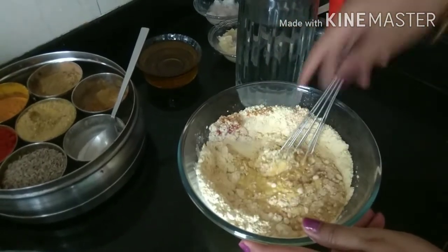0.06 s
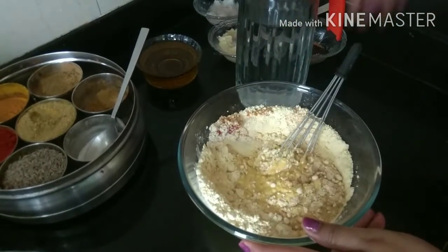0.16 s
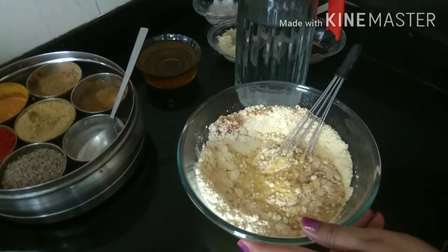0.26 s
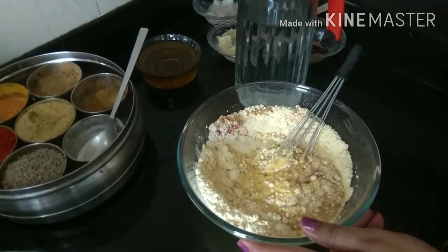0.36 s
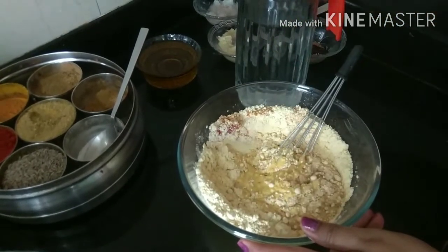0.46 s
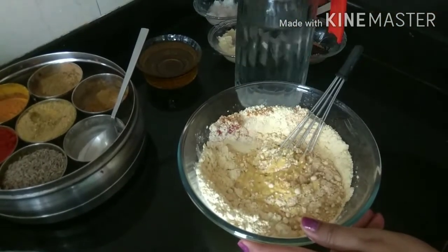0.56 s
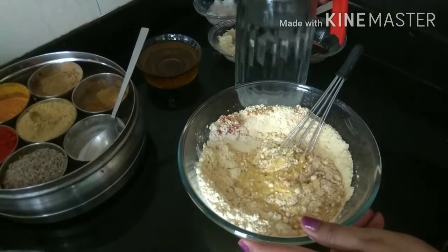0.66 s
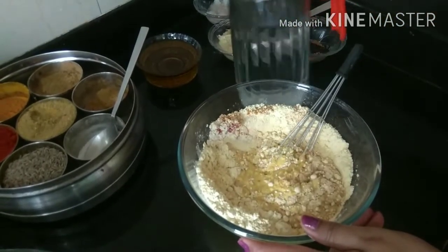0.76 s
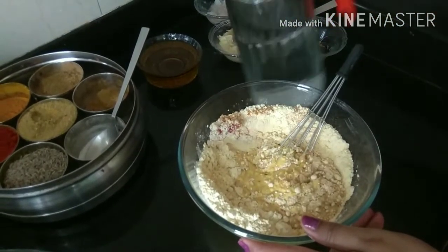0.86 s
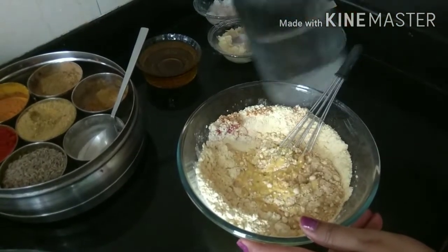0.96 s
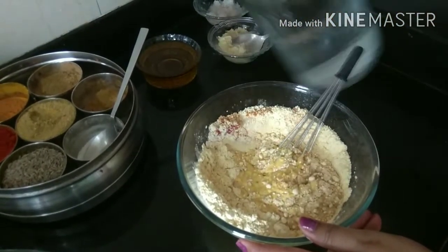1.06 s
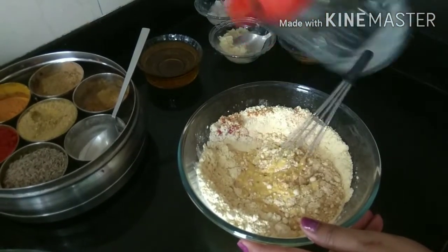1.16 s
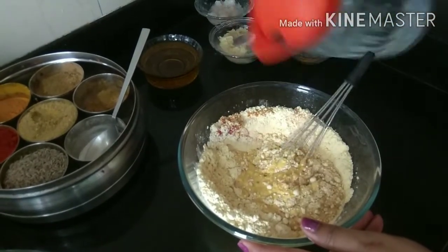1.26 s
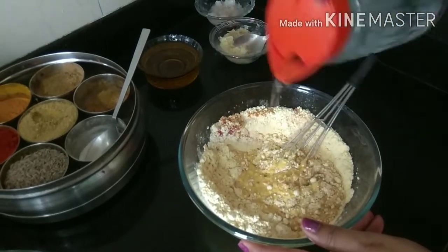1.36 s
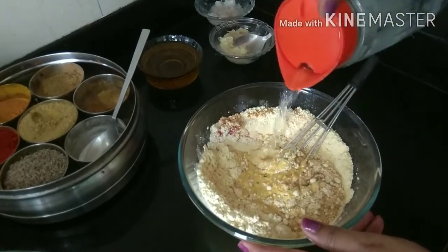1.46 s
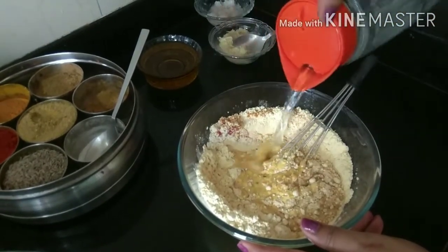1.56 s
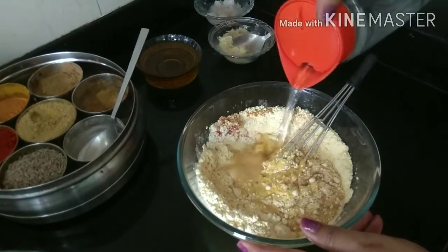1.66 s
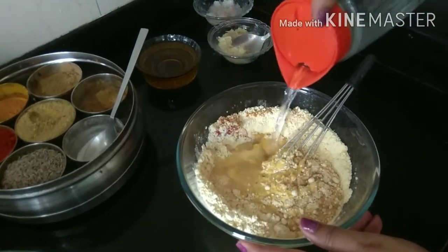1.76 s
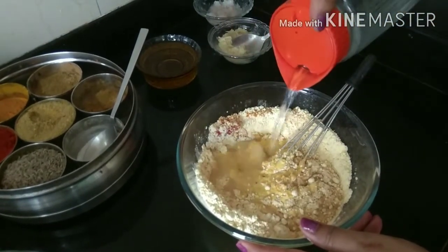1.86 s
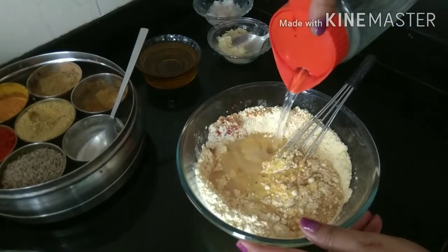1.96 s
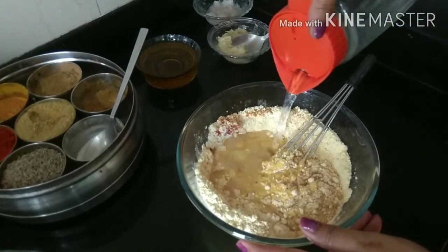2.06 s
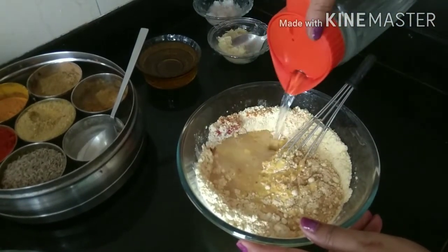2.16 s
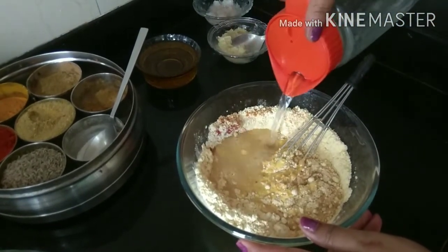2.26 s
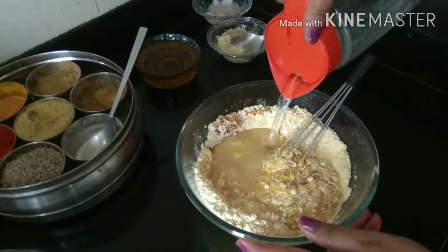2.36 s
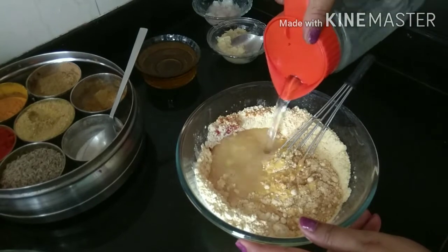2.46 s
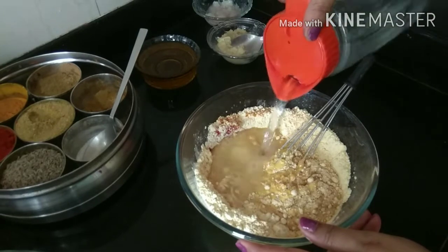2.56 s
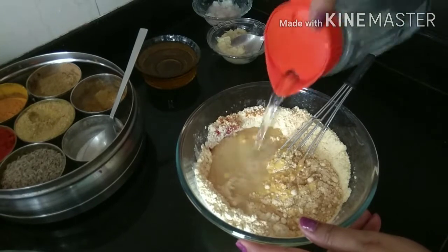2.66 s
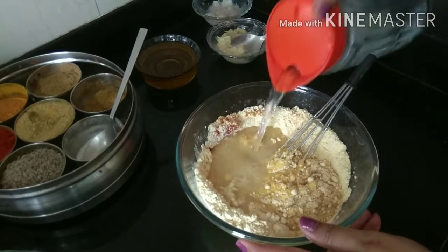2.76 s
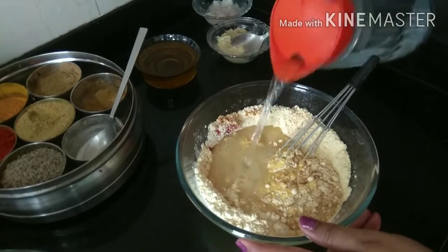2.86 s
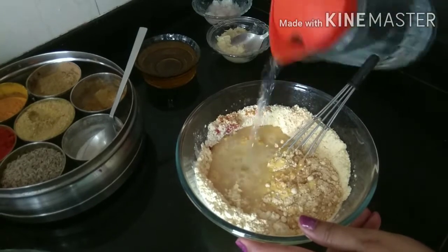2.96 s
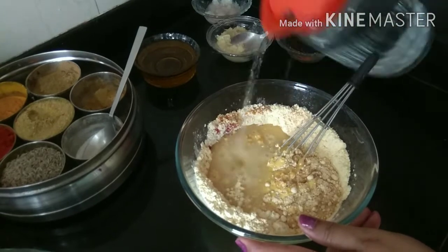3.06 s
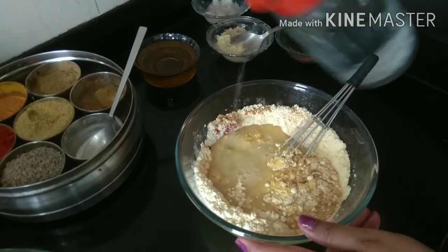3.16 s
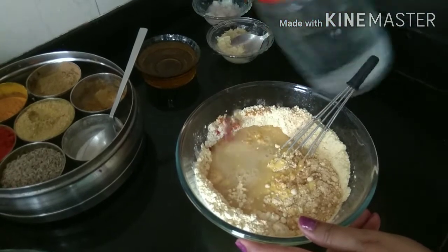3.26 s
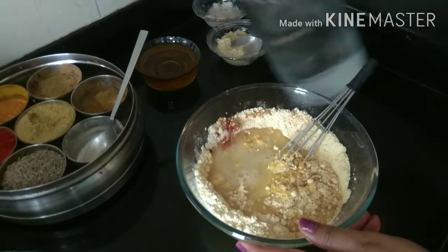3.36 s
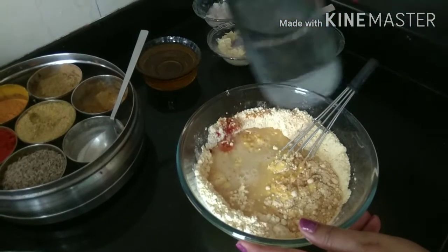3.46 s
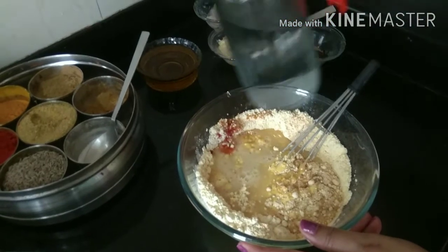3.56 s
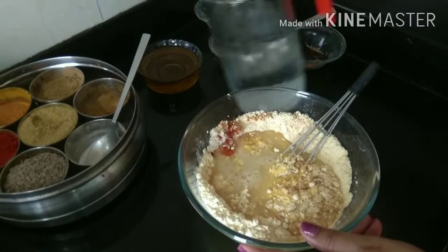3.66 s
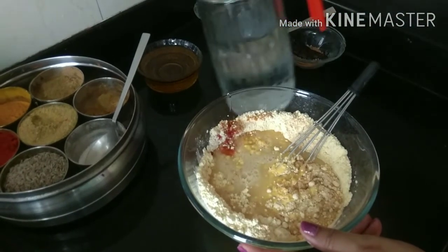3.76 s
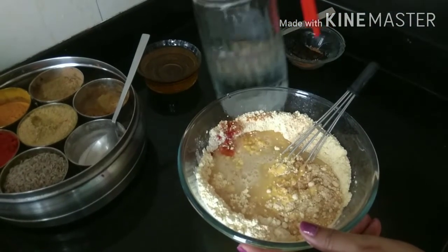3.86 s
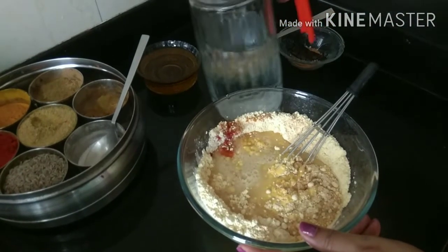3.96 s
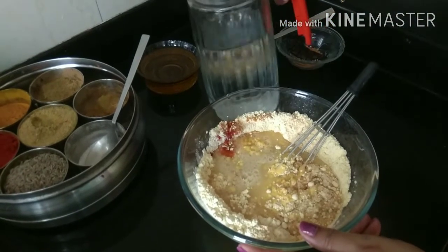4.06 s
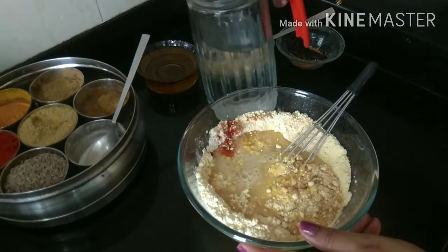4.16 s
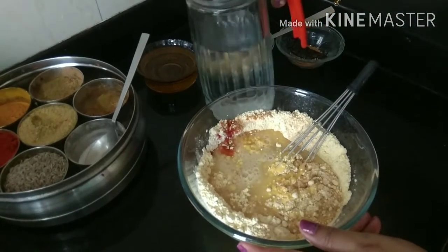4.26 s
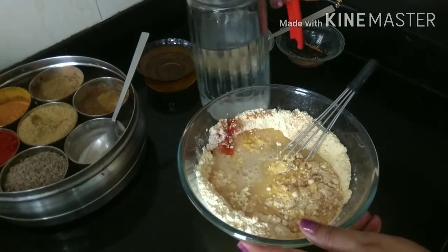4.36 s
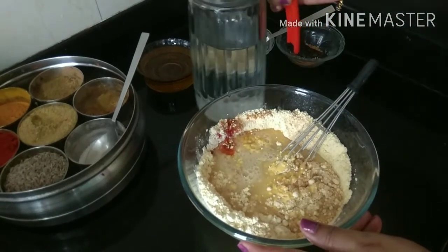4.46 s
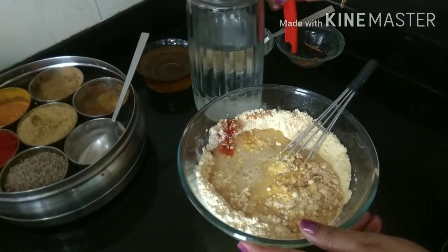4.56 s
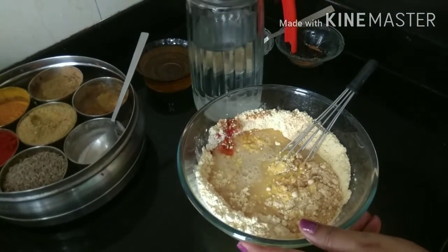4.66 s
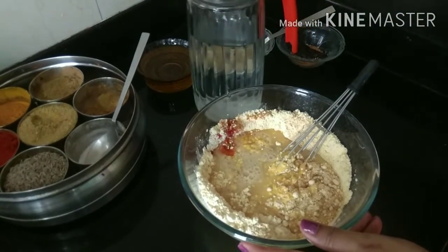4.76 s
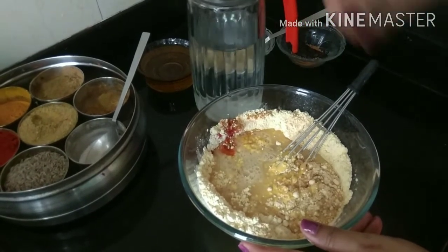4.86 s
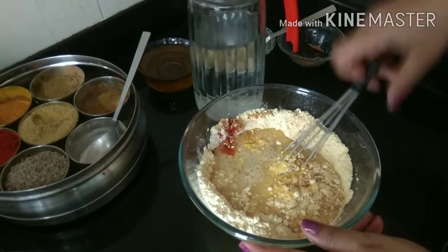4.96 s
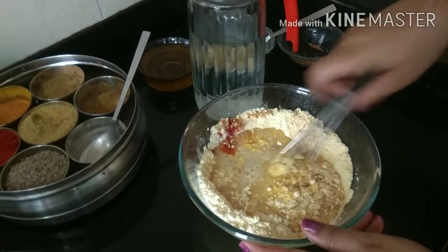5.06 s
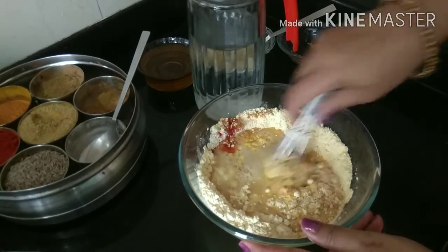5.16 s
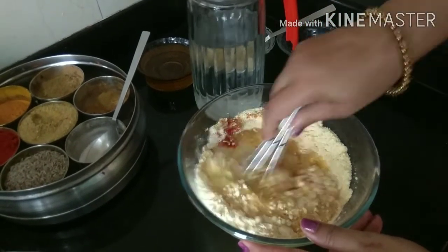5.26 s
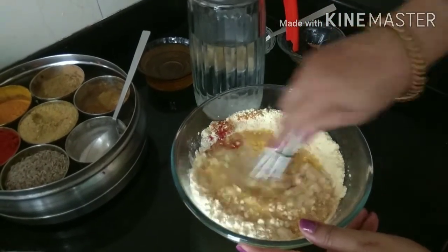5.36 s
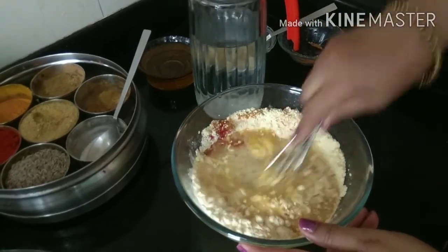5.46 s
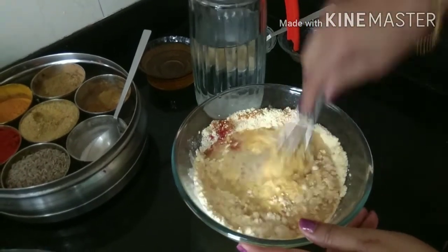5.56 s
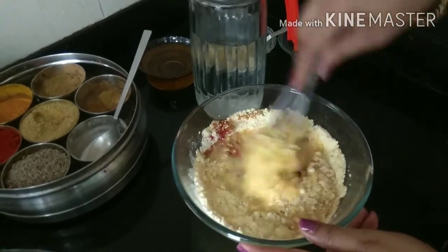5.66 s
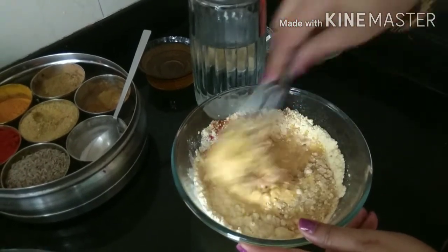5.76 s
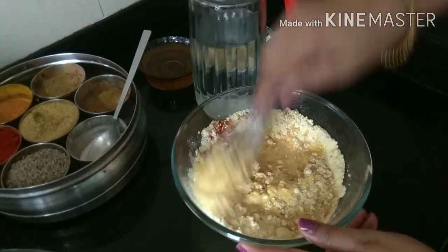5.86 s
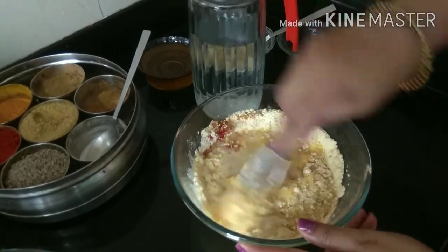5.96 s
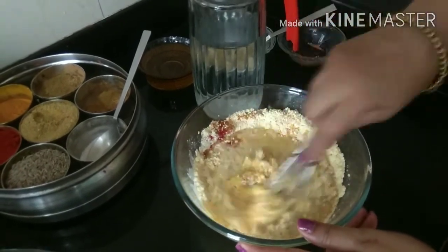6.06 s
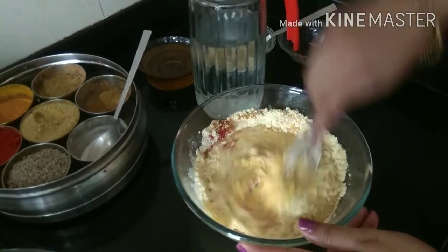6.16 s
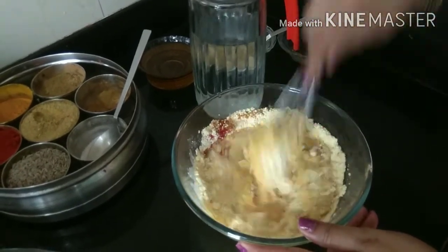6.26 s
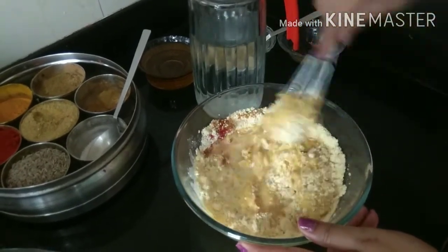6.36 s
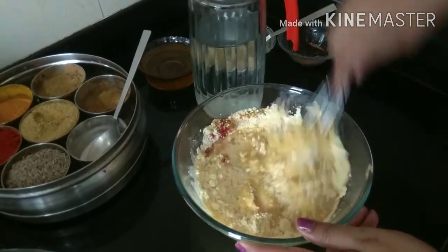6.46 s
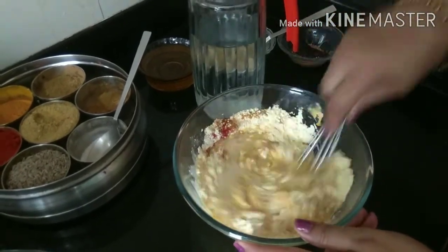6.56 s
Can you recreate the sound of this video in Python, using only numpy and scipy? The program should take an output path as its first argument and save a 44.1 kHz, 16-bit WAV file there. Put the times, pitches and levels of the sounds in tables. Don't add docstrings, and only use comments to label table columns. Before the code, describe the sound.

A glass jug knocks and rings, water pours with bright fizz and gurgle, the jug thuds down on stone, then a whisk strokes wet batter.

```python
import sys
import numpy as np
from scipy import signal
from scipy.fft import rfft, irfft
from scipy.io import wavfile
from scipy.ndimage import uniform_filter1d

SR = 44100
rng = np.random.default_rng(int(sys.argv[2]) if len(sys.argv) > 2 else 0)


def boost(x):
    u = np.asarray(x, float) / 20
    return 10 ** u


def log_audio(samples):
    frames = np.atleast_2d(samples).T
    limited = np.clip(frames, -1, 1)
    pcm = np.round(limited * 32767).astype(np.int16)
    wavfile.write(sys.argv[1], SR, pcm)


N = 291501
TIME = np.arange(N) / SR

# (f/Hz, density/dB per Hz)
FIZZ_COLOUR = [(2350, -26.5), (4000, -3), (6660, -7), (8700, -4.5), (9550, -2.5), (11300, -3),
               (14900, -16.5), (15500, -12.5), (16000, -48)]


def rms_one(x):
    return x / np.sqrt(np.mean(x ** 2) + 1e-20)


def at_hz(points, hz):
    p = np.array(points)
    return np.interp(np.log(np.maximum(hz, 1)), np.log(p[:, 0]), p[:, 1])


def pan(pan_db):
    return boost(np.array([[pan_db], [-pan_db]]) / 2)


def gain_curve(rows, db_at=0, follows=1):
    s, db = np.transpose(rows)
    fade = np.clip(np.minimum(TIME - s[0], s[-1] - TIME) / .04 + 1, 0, 1)
    return fade * boost(db_at + follows * np.interp(TIME, s, db))


def bursts(table, rise_s):
    gain = 0
    for s, db, length in table:
        decay = np.exp(-np.maximum(TIME - s, 0) / length)
        gain = gain + boost(db) * decay * np.clip((TIME - s) / rise_s, 0, 1)
    return gain


def swell(s, db, length, edge=0.17):
    inside = np.minimum(TIME - s, s + length - TIME)
    return boost(db) * np.sin(np.pi / 2 * np.clip(inside / (edge * length), 0, 1)) ** 2


def swells(table):
    return sum(swell(*row) for row in table)


def drift(rate):
    knots = rng.standard_normal(int(N / SR * 60) + 2)
    r = np.exp(-2 * np.pi * min(rate, 25) / 60)
    slow = signal.lfilter([1], [1, -r], knots)
    return np.interp(TIME * 60, np.arange(len(slow)), rms_one(slow))


def stereo_noise(alike):
    mid, side = rng.standard_normal((2, N))
    alike = np.clip(alike, 0, 1)
    return np.sqrt((1 + alike) / 2) * mid + np.sqrt((1 - alike) / 2) * side * [[1], [-1]]


def grains(per_s, spread_db):
    size = boost(spread_db * np.minimum(rng.exponential(1, N), 5)) * rng.choice([-1, 1], N)
    side = boost(rng.normal(0, 2.5, N))
    return (rng.random(N) < per_s / SR) * size * np.array([side, 1 / side]) + 1e-18


def colour(x, spectrum):
    size = 4096
    cepstrum = irfft(np.log(boost(at_hz(spectrum, np.arange(size // 2 + 1) * SR / size))))
    cepstrum[1:size // 2] *= 2
    cepstrum[size // 2 + 1:] = 0
    kernel = irfft(np.exp(rfft(cepstrum)))
    kernel = kernel.reshape((1,) * (x.ndim - 1) + (-1,))
    return signal.oaconvolve(x, kernel, axes=-1)[..., :x.shape[-1]]


def resonate(x, hz, width_hz):
    r = np.exp(-np.pi * width_hz / SR)
    poles = [1, -2 * r * np.cos(2 * np.pi * hz / SR), r * r]
    return signal.lfilter(np.array([1, 0, -1]) * (1 - r * r) / 2, poles, x)


def band_pass(x, order, low_hz, high_hz):
    return signal.sosfilt(signal.butter(order, [low_hz, high_hz], "band", fs=SR, output="sos"), x)


def patchy(x, depth_db, rate):
    edges = 25 * 2 ** np.arange(0, 9.5, 1 / 3)
    out = 0
    for low, high in zip(edges, edges[1:]):
        out = out + band_pass(x, 1, low, high) * boost(depth_db * drift(rate))
    return rms_one(out)


def pops(events, cycles, rise, spray_db, trim_db):
    out, t = np.zeros((2, N + SR)), np.arange(int(.04 * SR)) / SR
    tear_s = .002
    for s, peak_db, hz, pan_db in events:
        turn = np.maximum(t - tear_s, 0) * hz
        wave = np.sin(2 * np.pi * (turn + rise * turn ** 2))
        wave = wave * np.exp(-turn / cycles * 0.99) * np.minimum(turn / 1.1, 1)
        spray = rms_one(resonate(rng.standard_normal((2, len(t))), hz, 0.5 * hz))
        spray = spray * np.exp(-t / 0.0067) * np.minimum(t / 0.0026, 1)
        at = round((s - tear_s) * SR)
        burst = wave / np.max(wave) + boost(spray_db) * spray
        out[:, at:at + len(t)] += boost(peak_db + trim_db) * pan(pan_db) * burst
    return out[:, :N]


def background():
    # (f/Hz, density/dB per Hz)
    air_colour = [(70, -26), (108, -5), (478, -7.5), (706, -13.5), (1190, -6.5), (1440, -34), (1830, -20.5),
                  (2500, -42), (4170, -30.5), (5070, -47), (9930, -40.5), (11100, -28.5), (16000, -36.5)]
    # (f/Hz, width/Hz, level/dB)
    air_peaks = [(480, 1.4, -10.5), (1136, 92, -8.5), (1886, 76, -6), (2270, 160, -12), (10800, 630, -11.5)]
    # (t/s, level/dB, length/s)
    tremors = [(.27, -62, 0.1), (.62, -60, 0.064), (.95, -45.5, 0.19), (2.08, -61.5, 0.42), (2.72, -67, 0.12),
               (3.25, -57, 0.18), (3.52, -51.5, 0.39), (4.1, -49.5, 0.3), (4.46, -63.5, 0.22),
               (4.81, -57, 0.085), (5.2, -60.5, 0.276), (5.37, -57.5, 0.55), (6.09, -52, 0.082),
               (6.21, -54, 0.12), (6.48, -53, 0.28)]
    white = stereo_noise(0.017)
    air = patchy(colour(white, air_colour), 6.0, 3.0)
    for hz, width, db in air_peaks:
        air = air + boost(db + 4.0 * drift(4.0)) * rms_one(resonate(white, hz, width))
    shake = stereo_noise(.97)
    drone_hz, width_hz = 115.7, 23
    drone = rms_one(resonate(resonate(shake, drone_hz, width_hz), drone_hz, 2 * width_hz))
    drone = rms_one(resonate(drone, drone_hz, 3 * width_hz))
    rumble = boost(-12.0) * rms_one(resonate(resonate(shake, 29, 40), 29, 40))
    tremor_gain = boost(2 * drift(21)) * (boost(-71) + swells(tremors))
    return boost(-64) * air + (drone + rumble) * tremor_gain


def birds():
    # (t/s, level/dB, length/s, start f/Hz, end f/Hz)
    whistles = [
        (0.851, -63, 0.15, 3730, 4070),
        (0.861, -59, 0.15, 6520, 6460),
        (5.433, -75, 0.13, 3490, 4100),
        (5.629, -68.5, 0.19, 4270, 4260),
        (5.909, -59, 0.0305, 4030, 3850),
        (5.922, -76, 0.093, 4440, 4190),
        (6.314, -72.5, 0.2, 3420, 4150),
    ]
    # (t/s, level/dB, length/s)
    flock = [
        (-.1, -75.5, 2.3),
        (2.6, -77.5, 1.15),
        (3.7, -92, 0.78),
        (5.3, -84.5, 0.82),
        (6.1, -80.5, 0.37),
        (6.45, -73, 0.79),
    ]
    voices = [(3020, 490, -12.0), (3630, 1300, -5.0), (3950, 300, -11.5), (4240, 49, -8.5)]   # (f/Hz, width/Hz, level/dB)
    out, waver = np.zeros(N), 1 + 0.004 * drift(60)
    for s, db, length, start_hz, end_hz in whistles:
        along = np.clip((TIME - s) / length, 0, 1)
        arch = 1 + .035 * np.sin(np.pi * along) * length / .2
        pitch = (start_hz + (end_hz - start_hz) * along) * arch * waver
        out += np.sqrt(2) * np.sin(2 * np.pi * np.cumsum(pitch) / SR) * swell(s, db, length, edge=0.13)
    white, chatter = stereo_noise(0.27), 0
    for hz, width, db in voices:
        voice = rms_one(resonate(resonate(white, hz, width), hz, width))
        chatter = chatter + boost(db + 5 * drift(7)) * voice
    return out + boost(9.5) * rms_one(chatter) * swells(flock)


def stirring():
    # (f/Hz, density/dB per Hz)
    swish_colour = [(2650, -53), (4500, -8.5), (4650, -13.5), (6320, -9), (8740, 0), (9870, -3.5),
                    (11200, 2.5), (14800, -11), (16000, -30)]
    # (f/Hz, width/Hz, level/dB)
    bowl = [(436.2, 33, 7), (631, 12, 2), (1010, 79, 4.5), (820, 25, -1), (1171, 54, 9.5), (503, 10, 9),
            (1570, 90, 2.5), (1713, 150, 6), (1950, 33, -6), (2060, 17, -12)]
    # (t/s, level/dB)
    effort = [
        (4.85, -108),
        (5.07, -56),
        (5.27, -51),
        (5.44, -55.5),
        (5.87, -65),
        (6.17, -53.5),
        (6.43, -52),
        (6.61, -31.5),
    ]
    # (t/s, rms level/dB, length/s)
    strokes = [(.43, -46, 0.088), (.6, -47.5, 0.035), (3.36, -39, 0.038), (3.4, -42.5, 0.061),
               (3.75, -62.5, 0.19), (5.19, -52.5, 0.078), (5.44, -58, 0.049), (5.585, -51, 0.046),
               (5.645, -38, 0.047), (5.93, -48, 0.064), (6.02, -65, 0.015), (6.16, -64.5, 0.019),
               (6.205, -32.5, 0.024), (6.26, -51, 0.027), (6.305, -54, 0.073), (6.385, -58, 0.025),
               (6.5, -57, 0.032), (6.56, -71, 0.065)]
    # (t/s, level/dB, length/s)
    rubs = [(0, -64.5, 0.22), (.33, -60, 0.091), (.4, -53.5, 0.15), (.62, -59, 0.15), (.85, -63, 0.22),
            (3.4, -66.5, 0.034), (5.63, -61.5, 0.21), (5.9, -51.5, 0.11), (6.1, -64, 0.19),
            (6.33, -55.5, 0.194), (6.52, -61, .15)]
    # (t/s, level/dB, length/s)
    pushes = [
        (1.15, -92.5, 0.47),
        (3.6, -83, 0.19),
        (4.08, -64.5, 0.12),
        (5.21, -60, 0.15),
        (5.45, -63.5, 0.168),
        (6.35, -62, 0.071),
        (6.5, -56.5, 0.063),
    ]
    swish = rms_one(grains(2500, 3.5)) + 1.5 * stereo_noise(0.17)
    swish = patchy(colour(swish, swish_colour), 4.0, 6.4) * pan(5)
    rub, body = stereo_noise(0.2), 0
    for hz, width, db in bowl:
        body = body + boost(db + 3.5 * drift(4)) * resonate(resonate(rub, hz, width), hz, 2 * width)
    push = rms_one(resonate(rub, 185, 12) + 0.26 * resonate(rub, 330, 26))
    tearing = gain_curve(effort, -9.5) + bursts(strokes, 0.046)
    rubbing = boost(-68) + swells(rubs) + gain_curve(effort, -14.5)
    pushing = boost(-72.5) + swells(pushes)
    return swish * tearing + boost(-1.5) * rms_one(body) * rubbing + boost(3.5) * push * pushing


def ticks_and_smacks():
    # (t/s, peak level/dB, f/Hz, left-right/dB)
    ticks = [(4.9904, -57.5, 11000, 4), (5.0592, -53, 10970, 11), (5.193, -47, 10500, 5),
             (5.229, -39, 11600, 12), (5.3362, -56, 10900, 2), (5.346, -49, 10800, 12),
             (5.4503, -51, 11300, 9), (5.4797, -46, 11200, 15.0), (5.4897, -49, 11600, 13),
             (5.588, -48, 10800, 11), (5.6, -46.5, 10450, 15), (5.6397, -39.5, 9500, -6),
             (5.6563, -40, 11050, 1), (5.679, -34, 11950, 1), (5.8095, -52, 10700, 5),
             (5.9222, -53.5, 10600, -2.5), (5.955, -37.5, 10300, -8.5), (6.029, -36.5, 8720, -10),
             (6.051, -35.5, 8910, -11), (6.1682, -43.5, 10800, 3), (6.2126, -39.5, 11400, 9),
             (6.3122, -39, 12000, 15), (6.347, -41.5, 11600, 12), (6.3952, -42.5, 10800, 12),
             (6.441, -49, 8750, -17.5), (6.5099, -34, 11100, 5), (6.571, -45, 11400, 7)]
    # (t/s, peak level/dB, f/Hz, left-right/dB)
    smacks = [
        (0.654, -45.5, 127, -1),
        (5.916, -42, 1010, -9),
        (6.164, -49, 492, 12),
        (6.383, -52, 215, -12),
        (6.446, -43.5, 1260, 8),
        (6.568, -48, 120, 10),
    ]
    return (pops(ticks, cycles=8.8, rise=0.0016, spray_db=-13.0, trim_db=3.5)
            + pops(smacks, cycles=15.0, rise=0.00053, spray_db=-7.5, trim_db=-0.5))


def pour():
    # (t/s, level/dB)
    stream = [(1.45, -82), (1.53, -43.5), (1.77, -35), (2.06, -35.5), (2.2, -35.5), (2.43, -36), (2.6, -40),
              (2.72, -47.5), (2.9, -64), (2.95, -101), (3.05, -40), (3.09, -68), (3.19, -42.5), (3.32, -90)]
    # (t/s, level/dB, length/s, f/Hz)
    gulps = [
        (1.62, -65, 0.07, 712),
        (1.715, -56.5, 0.14, 623),
        (1.925, -55.5, 0.21, 689),
        (2.24, -53.5, 0.18, 694),
        (2.657, -61, 0.13, 734),
        (2.71, -80, 0.087, 2300),
        (2.743, -54.5, 0.068, 1844),
        (2.747, -53, 0.088, 2130),
        (2.816, -65, 0.049, 1990),
    ]
    fizz = rms_one(grains(1400, 1.5)) + 1.4 * stereo_noise(0.033)
    fizz = patchy(colour(fizz, FIZZ_COLOUR), 4, 14.0) * boost(2.5 * drift(22))

    clicks, pitches = grains(2000, 0.83), np.geomspace(1200, 4800, 16)
    dealt = rng.integers(0, len(pitches), N)
    gurgle = 0
    for k, hz in enumerate(pitches):
        gurgle = gurgle + resonate(clicks * (dealt == k), hz, hz / 14) * boost(5 * drift(12))

    wobble = signal.lfilter([1], [1, -.997], rng.standard_normal((2, N)))
    gulp = 0
    for s, db, length, hz in gulps:
        turn = 2 * np.pi * hz * TIME
        note = rms_one(wobble[0] * np.cos(turn) + wobble[1] * np.sin(turn))
        gulp = gulp + swell(s, db, length) * note

    follows = .4
    pool_fill_s = 0.27
    pool = np.clip((TIME - stream[0][0]) / pool_fill_s, 0, 1) ** 2
    gurgle_gain = gain_curve(stream, -47 + 40 * follows, follows) * pool
    return fizz * gain_curve(stream) + rms_one(gurgle) * gurgle_gain + gulp


def spatter_and_plops():
    # (t/s, peak level/dB, f/Hz, left-right/dB)
    spatter = [(1.4708, -26, 10800, -3), (1.4954, -31, 11650, 11), (1.5083, -33.5, 5970, -17.5),
               (1.561, -41, 11000, 3.5), (1.5783, -26, 11300, 3.5), (1.59, -20.5, 11300, 7),
               (1.6468, -21.5, 9600, 0), (1.6696, -25, 11700, 11), (1.699, -25, 9800, 1),
               (1.7096, -18, 9500, -1), (1.737, -26, 13000, 9), (1.7695, -20, 9800, 4),
               (1.795, -17, 9800, -2), (1.8066, -23, 10800, 9), (1.8392, -16, 8200, -2),
               (1.8693, -10, 9460, -3.5), (1.8994, -17, 10800, -3), (1.919, -20.5, 5900, -19),
               (1.924, -5.5, 9300, 6.5), (1.9465, -18, 10700, 5), (2.0316, -16.5, 9800, -26),
               (2.035, -3.5, 10680, 8.5), (2.037, -17, 5930, -9), (2.1034, -20, 10600, 1.5),
               (2.1186, -18, 9500, -6), (2.1836, -25.5, 9500, 7), (2.2439, -19, 9600, 2),
               (2.265, -22, 11500, 14), (2.3287, -19, 9600, -1), (2.3444, -46, 10000, 2),
               (2.368, -15.5, 8600, -8), (2.387, -36, 8230, -1), (2.405, -20, 9400, -1),
               (2.4405, -24.5, 7840, -10), (2.4556, -14, 11100, 6), (2.5244, -34, 9550, -1),
               (2.5908, -10, 9500, 0), (2.5934, -22.5, 8720, -16.5), (2.5965, -17.5, 6300, -8),
               (2.92, -28, 9230, 7), (2.9478, -17, 10300, -2), (2.9727, -15.5, 9460, -0.5),
               (3.0024, -22.5, 10800, 11), (3.0425, -24, 10800, 1), (3.0614, -18.5, 11300, 12),
               (3.0764, -10, 10700, -7), (3.0877, -11.5, 11200, -4), (3.1032, -16.5, 12100, 14),
               (3.145, -20, 6100, -3), (3.16, -16.5, 7600, -5), (3.1784, -22, 11800, 3.0)]
    # (t/s, peak level/dB, f/Hz, left-right/dB)
    plops = [(1.5134, -41, 3000, 8), (1.5896, -26, 4470, -3), (1.6714, -20, 4050, 3),
             (1.7323, -22, 2950, 2), (1.8, -24.5, 4170, -3), (1.8612, -20.5, 4450, 0),
             (1.9134, -28, 3630, 3), (1.9235, -44, 4070, 5), (1.9585, -25, 3770, 6),
             (2.0351, -27.5, 1520, -13), (2.1354, -31, 2140, -13), (2.2047, -25.5, 2350, -1),
             (2.2466, -27, 3480, -8), (2.2915, -21.5, 2820, -4), (2.3602, -23, 3320, 4),
             (2.369, -29, 1280, 2), (2.4228, -26, 3850, -4), (2.4527, -21.5, 3380, -1),
             (2.4977, -24.5, 4300, -11), (2.524, -26.5, 1380, -4), (2.5508, -26.5, 1560, -5),
             (2.5975, -31.5, 1470, -11), (2.6178, -28.5, 1950, -5), (2.7223, -35, 2980, 0),
             (2.7386, -29.5, 2730, -5), (2.836, -33, 3010, 3), (2.8862, -39, 4200, -15),
             (2.9063, -31, 3950, -4), (3.0099, -35, 4260, -19), (3.0743, -32.5, 4380, 5),
             (3.1024, -25, 4770, -11), (3.1445, -33.5, 1130, -14), (3.1598, -31.5, 1160, -7)]
    return (pops(spatter, cycles=4.8, rise=0.0012, spray_db=-12.0, trim_db=1.5)
            + pops(plops, cycles=7.4, rise=0.0045, spray_db=3.0, trim_db=-9.5))


def slosh():
    # (t/s, rms level/dB, length/s)
    slaps = [
        (1.1, -10.5, 0.0038),
        (1.158, -15.5, 0.0097),
        (1.293, -29.5, 0.0041),
        (4.385, -35.5, 0.008),
        (4.525, -31, 0.02),
        (4.598, -38, 0.036),
        (4.655, -36, 0.026),
    ]
    return bursts(slaps, 0.0099) * patchy(colour(stereo_noise(0.34), FIZZ_COLOUR), 0.44, 7.2)


def knock(contacts, modes, thud, ring_db, glide, pan_db):
    out, t = np.zeros((2, N)), np.arange(int(.8 * SR)) / SR
    for s, peak_db, glass_db, length in contacts:
        late = s - contacts[0][0]
        crack = stereo_noise(0.35)[:, :len(t)] * np.exp(-t / length)
        crack = colour(crack * np.clip(t / (0.00059 + 0.015 * late), 0, 1), thud)
        turn = 2 * np.pi * (t + glide * (late + t) ** 3)
        ring = 0
        for hz, db, t60 in modes:
            phase = rng.uniform(0, 2 * np.pi, (2, 2, 1))
            twin = 1 + rng.normal(0, 0.008) * hz / 4000
            pair = np.sin(hz * turn + 0.8 * phase[0])
            pair = pair + min(hz / 8000, 1) ** 2 * np.sin(hz * twin * turn + phase[1])
            ring = ring + boost(db - 60 * t / t60 + 2.5 * drift(25)[:len(t)]) * pair
        ring = ring * np.clip(t / 0.0083, 0, 1)
        hit = crack / np.max(np.abs(crack)) + boost(ring_db + glass_db) * ring
        at = round(s * SR)
        out[:, at:at + len(t)] += boost(peak_db) * hit
    return out * pan(pan_db)


def jug_knocks():
    # (t/s, peak level/dB, share of glass ring/dB, thud length/s)
    lift = [
        (0.9755, 5, -0.5, 0.0099),
        (1.009, -4, -29.5, 0.011),
    ]
    first_set = [
        (4.198, -4.5, 6.5, 0.011),
        (4.273, -15.5, -16.5, 0.016),
        (4.298, -15.5, -3, 0.016),
    ]
    last_set = [
        (4.471, -9.5, -10.5, 0.013),
        (4.4745, -2, -4, 0.0078),
        (4.488, -22, 7.5, 0.031),
        (4.515, -36, 2.5, 0.015),
    ]
    # (f/Hz, level/dB, t60/s)
    lift_modes = [(135, -25, 0.28), (571.6, -11.5, 0.14), (1646.6, -3, 0.33), (2270, -15, 0.6),
                  (2550, -21, .22), (3612, -18, 0.53), (4174, 0.5, 0.053), (5717, -24.5, .2),
                  (7720, -18, .12), (8440, -28.5, .2), (9200, -25, .2), (9350, -19.5, 0.17),
                  (9940, -20.5, 0.1), (10400, -25.5, 0.19), (10910, -25.5, .2)]
    first_modes = [(222, -3, 0.47), (778, -2, 0.75), (1734, -4.5, 0.3), (2160, 0.5, 0.15), (2291, -7, 0.73),
                   (4030, -20.5, .2), (5300, -22, .12), (5700, -23, 0.14), (6950, -20, .15),
                   (10200, -22.5, 0.51)]
    last_modes = [(231.7, -17, 0.22), (816, -15, 0.12), (1743, -13, 0.59), (2194, 3.5, 0.16),
                  (2304, -14.5, .4), (3628, -20, 0.28), (4290, -25, .15), (5000, -16.5, .1),
                  (5389, -11, 0.12), (7130, -19, .1), (7600, -23.5, 0.11), (10120, -9, 0.071)]
    # (f/Hz, density/dB per Hz)
    lift_thud = [(53, -42), (120, -22), (821, -14), (1320, -23.5), (1640, -11.5), (2130, -23.5),
                 (2590, -13.5), (5900, -19), (6870, -22), (12100, -20), (16000, -36.5)]
    first_thud = [(53, -82.5), (115, -9.5), (620, -6.5), (786, 1.5), (1750, -26), (1950, -29), (2180, -20),
                  (2760, -27.5), (7490, -35), (14400, -42), (16000, -46)]
    last_thud = [(53, -78), (120, -23), (786, -5.5), (2000, -15), (2230, 1), (2480, -24.5), (5300, -21.5),
                 (8350, -35), (10600, -24), (15000, -33), (16000, -46)]
    return (knock(lift, lift_modes, lift_thud, ring_db=-9.5, glide=.18, pan_db=2.0)
            + knock(first_set, first_modes, first_thud, ring_db=-26.0, glide=0.00056, pan_db=-1.0)
            + knock(last_set, last_modes, last_thud, ring_db=-6.0, glide=0.00077, pan_db=-1.5))


def kitchen(x):
    # (f/Hz, t60/s)
    decay = [(100, 0.69), (500, 0.39), (2000, 0.47), (6000, 0.37), (14000, 0.2)]
    t = np.arange(int(.7 * SR)) / SR
    tail = 0
    for low in 60 * 2. ** np.arange(8):
        white = stereo_noise(.92 - .22 * np.log2(low / 100))[:, :len(t)]
        band = band_pass(white, 2, low, 2 * low)
        tail = tail + band * boost(-60 * t / at_hz(decay, low * np.sqrt(2)))
    tail = tail * np.clip(t / 0.01, 0, 1)
    return signal.fftconvolve(x, tail / np.sqrt(np.sum(tail ** 2) / 2), axes=1)[:, :N]


def scene():
    jug = jug_knocks() + slosh()
    drops = spatter_and_plops() + ticks_and_smacks()
    song = birds()
    wet = boost(-5.5) * jug + boost(3.0) * song + boost(-11) * drops
    return jug + drops + boost(6.0) * song + kitchen(wet) + pour() + stirring() + background()


def duck_weak_bands(x):
    # (f/Hz, margin/dB)
    margin = [(2400, 4), (4100, 7), (4800, .5), (8000, 2), (10500, 7), (13000, 3.5), (16000, 1)]
    hz, _, z = signal.stft(x, SR, nperseg=1024, noverlap=768)
    now = np.abs(z).sum(0) ** 2 + 1e-18
    power = np.abs(uniform_filter1d(now, size=7, axis=1)) + 1e-18
    high = hz > 2400
    share = power / uniform_filter1d(power, size=15, axis=0) / .85
    wander = rms_one(uniform_filter1d(rng.standard_normal(power.shape), size=14, axis=1))
    wander = wander[np.arange(len(hz)) // 7 * 7]
    band_db = 10 * np.log10(np.abs(uniform_filter1d(power, size=5, axis=0)) + 1e-18)
    spare_db = band_db - uniform_filter1d(band_db, size=60, axis=0)
    spare_db = spare_db + at_hz(margin, hz)[:, None] + 4.5 * wander
    total_db = 10 * np.log10(now[high].sum(0))
    steady = np.exp(-np.maximum(total_db - np.roll(total_db, 4) - 2.5, 0) / 2)
    ducked = np.minimum(share, 1) ** 2 * boost(8 * np.minimum(spare_db, 0))
    gain = np.where(high[:, None], ducked, 1)
    return signal.istft(z * gain ** steady, SR, nperseg=1024, noverlap=768)[1][:, :N]


def roll_off(x):
    return signal.sosfilt(signal.butter(12, 16190, fs=SR, output="sos"), x)


def record(dry):
    # (f/Hz, width/Hz, share removed)
    dips = [(2850, 500, .45), (4850, 600, .55), (6850, 800, .5)]
    heard = signal.sosfilt(signal.butter(2, 85, "high", fs=SR, output="sos"), dry)
    for hz, width, share in dips:
        heard = heard - min(share, 1) * resonate(heard, hz, width)
    mid, side = (heard[0] + heard[1]) / 2, (heard[0] - heard[1]) / 2
    side = signal.lfilter(*signal.butter(1, 300, "high", fs=SR), side)
    side = side + 0.18 * resonate(mid, 11000, 6000)
    heard = duck_weak_bands(np.array([np.roll(mid + side, 3), mid - side]))
    top = 2.0
    loud = np.clip(top * np.tanh(heard / top), -.93, .93)
    cut = signal.sosfilt(signal.cheby2(10, 40, 16100, fs=SR, output="sos"), loud)
    return roll_off(np.clip(cut, -1, 1))


dry = scene()
out = record(dry)
log_audio(out)
```